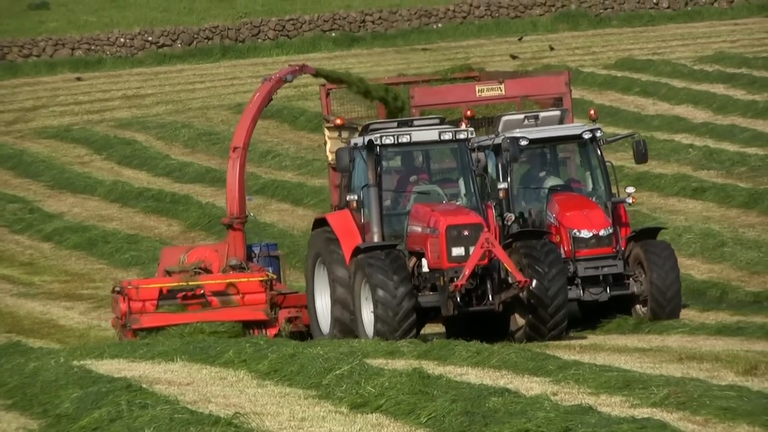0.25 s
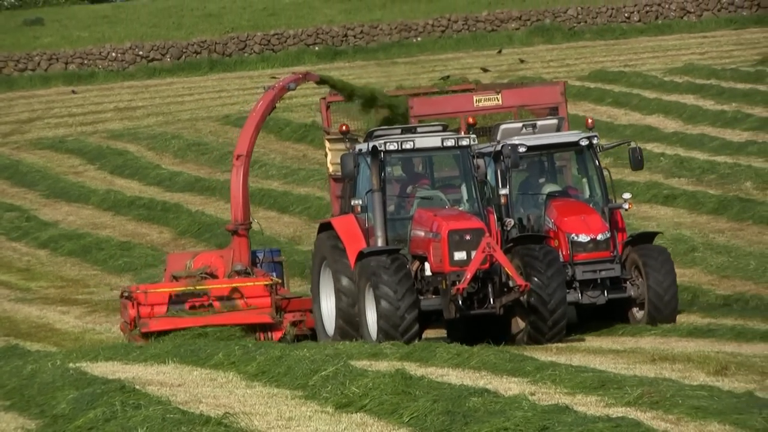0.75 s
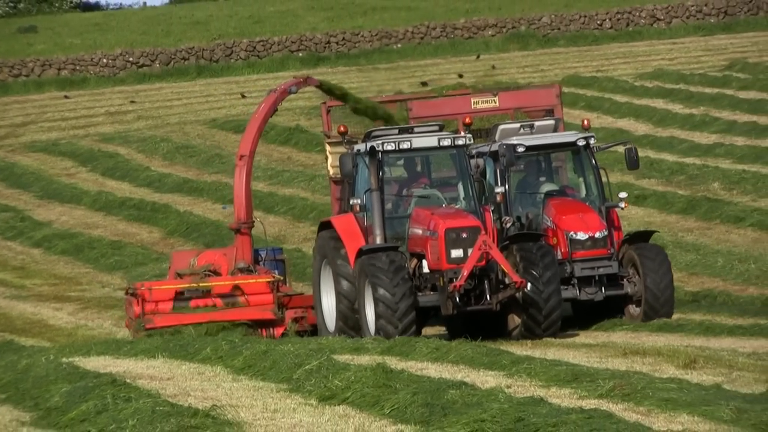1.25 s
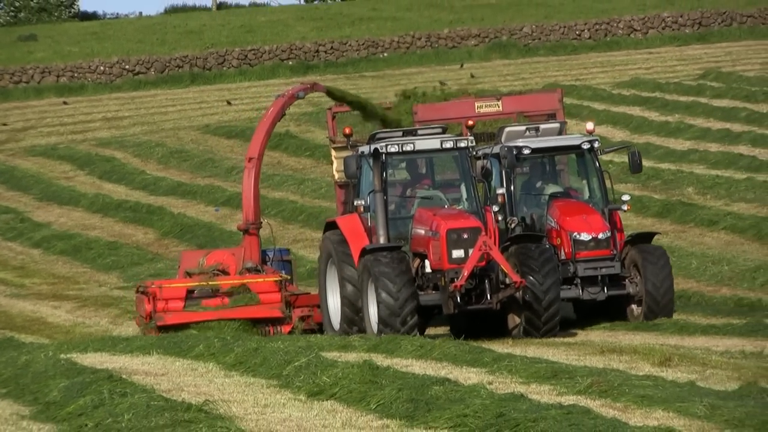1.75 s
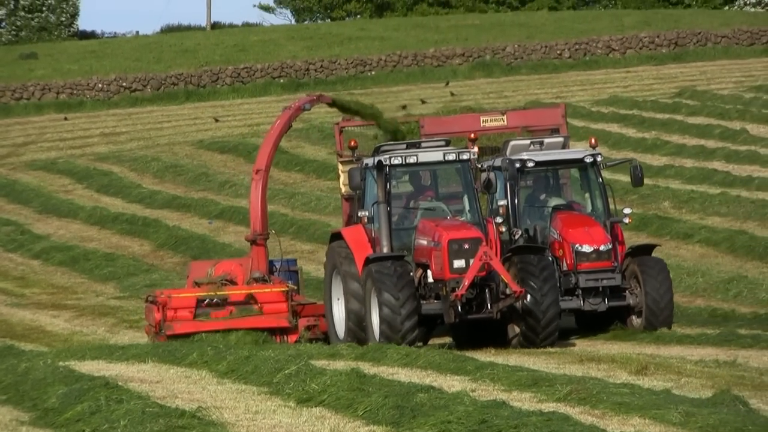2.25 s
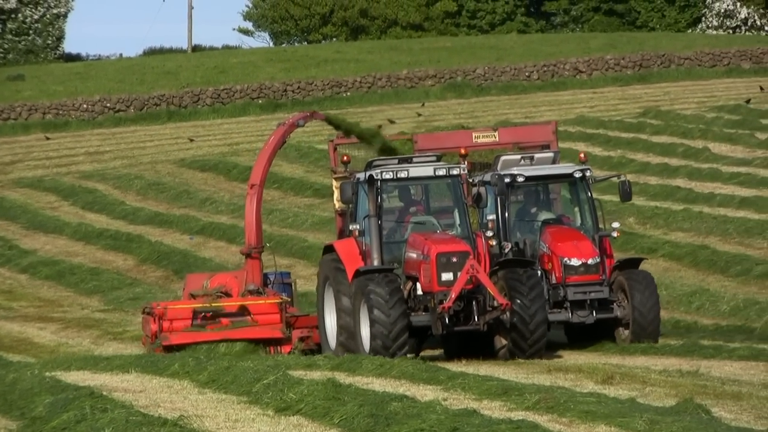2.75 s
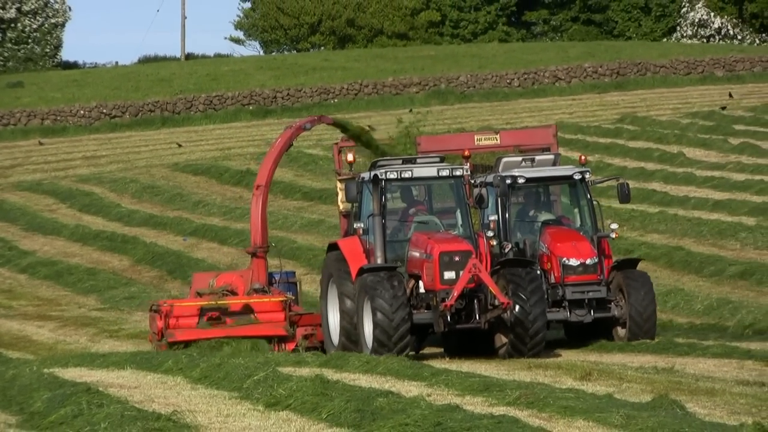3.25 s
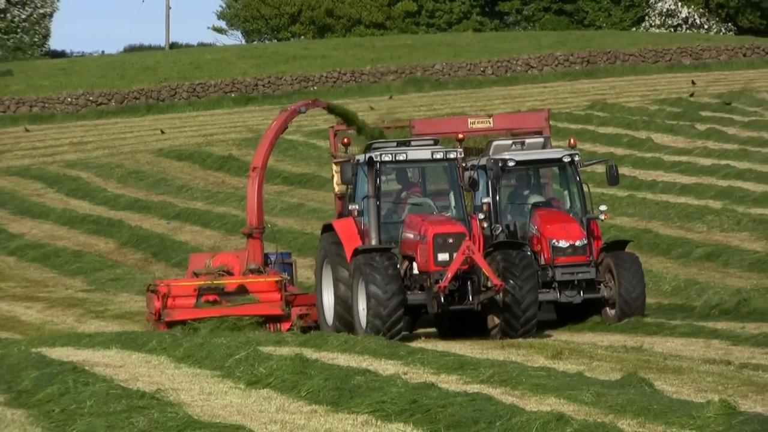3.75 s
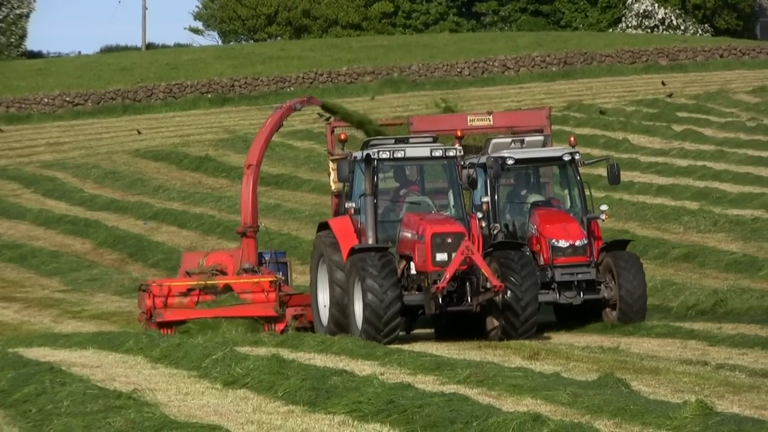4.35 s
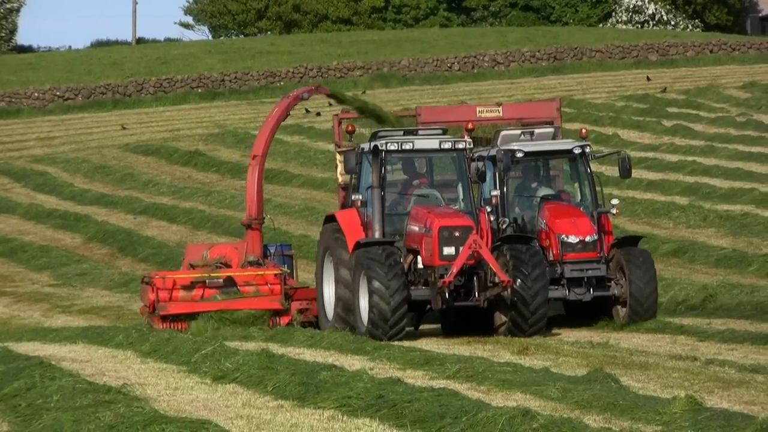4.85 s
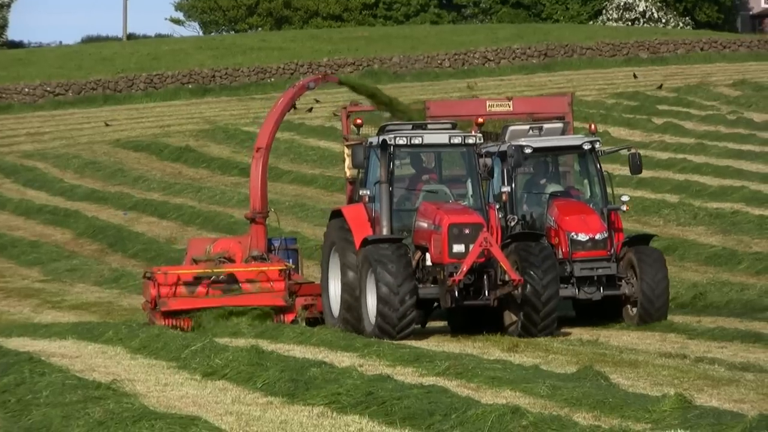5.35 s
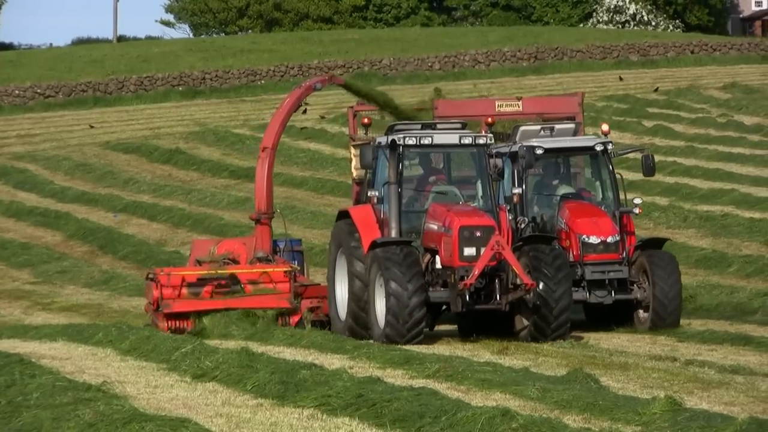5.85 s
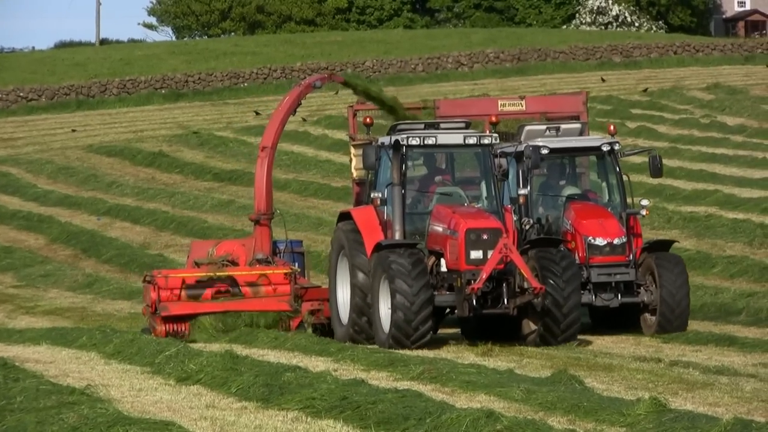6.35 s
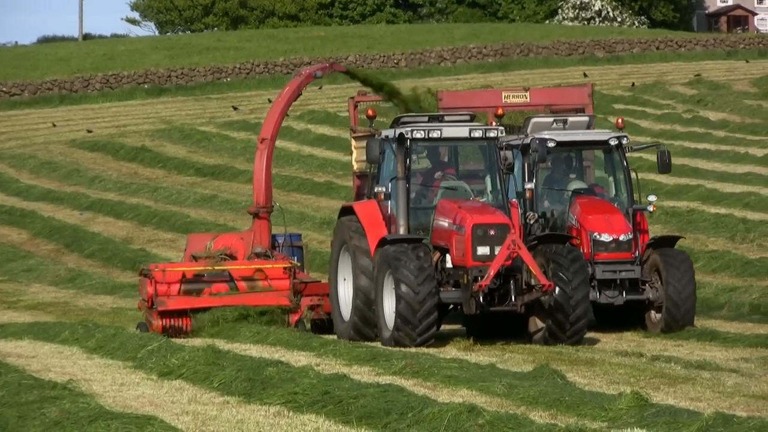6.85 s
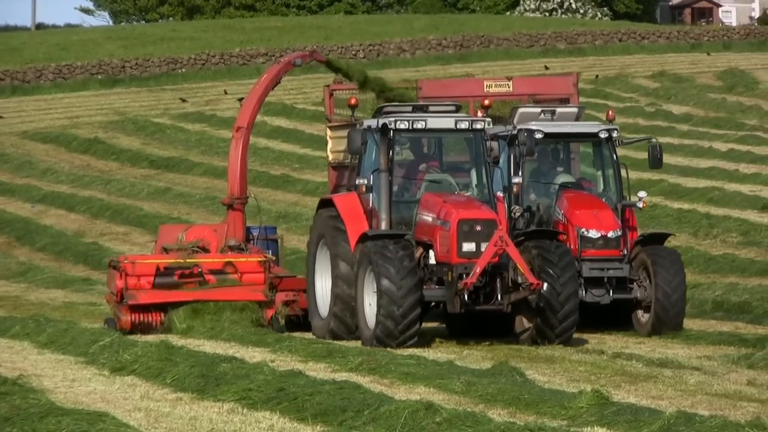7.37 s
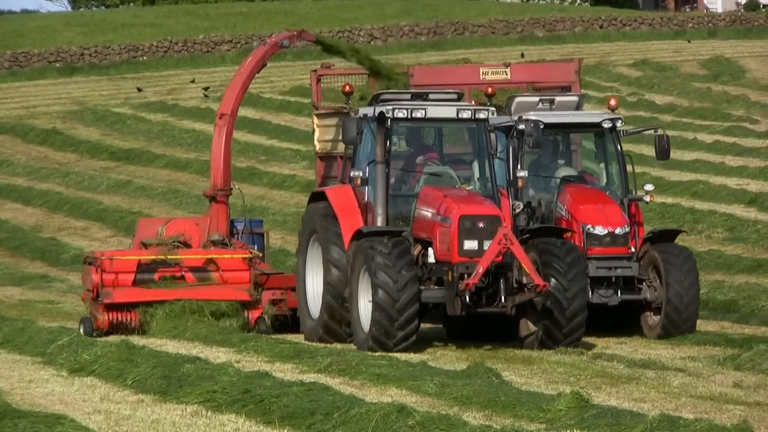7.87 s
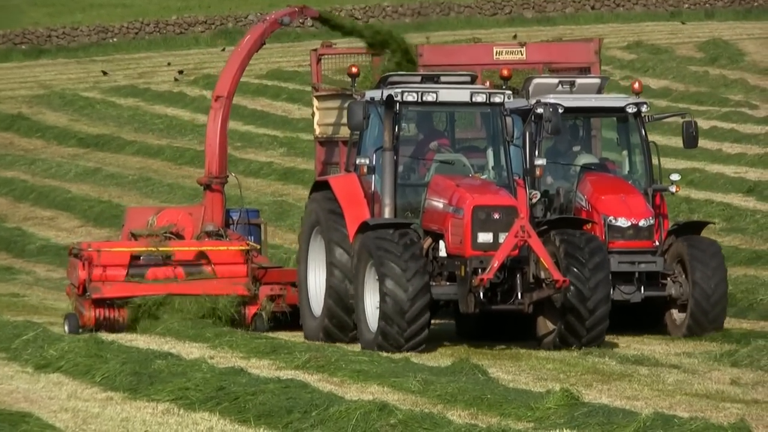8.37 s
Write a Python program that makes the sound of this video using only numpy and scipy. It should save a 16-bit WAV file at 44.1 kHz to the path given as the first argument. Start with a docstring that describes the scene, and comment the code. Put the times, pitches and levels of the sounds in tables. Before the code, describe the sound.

Steady diesel tractor drone and clatter, with a forage harvester's throbbing blades and hissing grass, gradually coming closer.

```python
"""A six-cylinder diesel tractor hums and clatters over a field, driving a forage harvester (a grass chopper).
Each firing pushes a pulse out of the exhaust and knocks the casing; the hum beats against the blades' hum.
Cut grass hisses up the spout, thick wads scrape and squeal, steel clanks and turbos whistle faintly.
A second tractor crawls alongside with the trailer, its gears whining. All slowly come closer, and the
distant microphone's gain control lifts everything else whenever engine hum and blade hum cancel."""
import sys
import numpy as np
from scipy import signal
from scipy.fft import rfft, irfft, next_fast_len
from scipy.io import wavfile
from scipy.ndimage import uniform_filter1d, map_coordinates

SR = 44100
rng = np.random.default_rng(int(sys.argv[2]) if len(sys.argv) > 2 else 0)


def generate_wav(sig):
    """Save sig (samples, or channels by samples) to the path in sys.argv[1] as 16-bit PCM at SR."""
    pcm = np.round(np.clip(np.atleast_2d(sig).T, -1, 1) * 32767).astype(np.int16)
    wavfile.write(sys.argv[1], SR, pcm)


N = 379701
TIME = np.arange(N) / SR

# how fast the main engine fires (time [s], firing rate [Hz])
FIRING_RATE = [(0.2, 103.4), (0.5, 105), (1.0, 104.7), (1.3, 103.2), (1.8, 103.0), (2.15, 104.2),
               (2.5, 102.6), (3.2, 104.2), (3.8, 103.8), (4.8, 104.2), (5.4, 103.75), (6.5, 106.3),
               (7.1, 105.1), (7.6, 105.2), (8.0, 106), (8.6, 104.7)]
# exhaust overtones; one engine cycle is six firings (multiple of the cycle rate [-], relative level [dB])
EXHAUST_TONES = [(5, -30), (7, -29), (11, -33), (13, -34), (14, -37), (16, -39)]
# tones of the engine block (multiple of the cycle rate [-], relative level [dB])
BLOCK_TONES = [(19, 0), (23, -1), (32, -11), (38, -11), (42, -9)]
# how hard each cylinder knocks, in firing order (relative level [dB])
CYLINDER_KNOCK_DB = [-3, -7, 1.6, 1.7, -1.5, -3.5]
# ring of the engine casing from far off (frequency [Hz], relative level [dB])
FAR_CASING_SPECTRUM = [(350, -44), (600, -19.5), (708, -9), (828, -19), (954, -7), (1130, -9), (1310, -5),
                       (1520, -5.5), (1830, -1.5), (2160, -1), (3200, -3), (3660, -12), (3930, -18.5),
                       (5110, -57), (8650, -120)]
# ring of the casing from closer by (frequency [Hz], relative level [dB])
NEAR_CASING_SPECTRUM = [(350, -34), (600, -14.5), (760, -4), (841, -27), (977, -2), (1170, -9),
                        (1250, -5.5), (1800, 0), (1950, -0.5), (2010, -1), (2390, -3.5), (3490, -14),
                        (3930, -32), (5110, -24.5), (8650, -120)]
# rumble of the running gear (frequency [Hz], relative level [dB])
RUMBLE_SPECTRUM = [(20, -11), (30, -0.5), (45, 5), (70, 2), (115, 13.5), (170, 7), (280, 2), (390, -2.5),
                   (500, -6.5), (720, -5.5), (850, -6.5), (1500, -8.5), (4000, -48.5)]
# hiss of grass in the spout (frequency [Hz], relative level [dB])
GRASS_SPECTRUM = [(1500, -26.5), (3700, 4), (4700, -0.5), (6000, -8), (7200, -11.5), (8000, -13),
                  (9800, -15.5), (11500, -23), (13000, -31), (15000, -45.5)]
# the row of grass thickens and thins (time [s], hiss against the clatter [dB], blade throb [dB])
GRASS_FEED = [(0, -25, -26), (2, -20.5, -23.5), (3.3, -19, -25.5), (4.2, -17.5, -22), (5, -16.5, -26.5),
              (6.4, -14.5, -25), (7.1, -16, -36.5), (8.6, -15.5, -29)]
# moments when the blade hum works against the engine hum (time [s])
CANCEL_TIMES = [-.25, .66, 1.5, 2.36, 3.14, 3.96, 4.88, 5.66, 6.48, 7.42, 8.28, 9.15]
# throb of the blades (multiple of the blade rate [-], relative level [dB])
THROB_TONES = [(3, -3), (4, -8.5)]
# buzz of the chopper's housing (multiple of the blade rate [-], relative level [dB])
BUZZ_TONES = [(5, -0.5), (6, -17.5), (7, -17), (8, -34.5)]
# strength of that buzz before its swells are added (time [s], level [dB])
BUZZ_LEVEL = [(0, -27.5), (.4, -34), (.9, -37), (1.15, -26.5), (1.7, -33), (2.75, -31), (3.2, -29.5),
              (4.1, -28), (4.7, -34.5), (5.2, -24.5), (6, -36), (7.7, -33), (8.6, -32.5)]
# how fast the second tractor fires (time [s], firing rate [Hz])
SECOND_FIRING_RATE = [(0, 106.4), (.4, 106.2), (1.1, 104.9), (2, 105.8), (3.7, 106.3), (6, 105.2),
                      (6.8, 103.6), (8.6, 102.9)]
# its hum and gear whine (multiple of its firing rate [-], relative level [dB])
SECOND_TONES = [(1, 3), (18, -4), (19, -7), (20, 0), (21, -2), (22, -7)]
# whistle of the turbos (frequency [Hz], relative level [dB])
TURBO_SPECTRUM = [(7500, -24.5), (7730, -5), (7850, -7.5), (7970, 0), (8250, -5.5), (8800, -35),
                  (13000, -40), (13440, -16), (13700, -45)]
# single hard blows on steel (time [s], level [dB], ring frequency [Hz])
STEEL_BLOWS = [(.31, -22.5, 2600), (1.634, -22.5, 2200), (2.213, -19, 2400), (2.855, -21, 2000),
               (5.864, -20, 2000), (6.658, -20, 1900), (7.415, -17.5, 2100), (8.35, -22, 3000)]
# wads of grass in the spout (time [s], level [dB], rise [s], decay [s], share of squeal [0-1])
GRASS_WADS = [(.51, -38.5, 0.024, 0.091, 0.8), (.8, -44, .01, .02, 0.8), (.89, -40, .02, 0.021, 0.6),
              (1.41, -41.5, 0.057, 0.065, 0.68), (1.63, -48, .06, .07, 0.6),
              (5.15, -38, 0.0049, 0.019, 0.22), (5.691, -48, .03, 0.046, .8), (6.527, -35, .004, .018, .1),
              (6.65, -46, .03, .04, 0.21), (8.355, -36, .04, 0.12, 0.1), (8.367, -41, .003, .008, 0)]
# bright rush of a wad (frequency [Hz], relative level [dB])
SPRAY_SPECTRUM = [(2000, -11), (3500, 7.5), (6000, -3), (10000, -4.5), (13000, -17), (15000, -23)]
# grass squealing on steel (frequency [Hz], relative level [dB])
SQUEAL_SPECTRUM = [(3500, -25), (4600, -3), (5300, 5), (6500, -10), (8000, -21), (12000, -25)]

# each pair holds the value at the (start, end) of the approach
EXHAUST_DB, BLOCK_DB, CLATTER_DB, BLADE_HUM_DB = (-14.5, -12), (-46, -37.5), (-22, -25), (-26, -15.5)
OVERTONE_DB, RUMBLE_DB = (-1.5, 3), (-5.5, 2.5)  # on top of the exhaust level and the clatter level
KNOCK_CONTRAST = (.97, .83)  # below 1 the knocks blur into a rush


def undb(db):
    """Turn decibels into a gain."""
    return 10 ** (np.asarray(db) / 20)


def unit(x):
    """Scale a signal to an average strength (rms) of 1."""
    return x / np.sqrt(np.mean(x ** 2))


def sine(turns):
    """A pure tone of rms 1, one wave per turn."""
    return np.sqrt(2) * np.sin(2 * np.pi * turns)


def curves(table):
    """Join the points of each table column with straight lines in time."""
    times, *columns = np.transpose(table)
    return [np.interp(TIME, times, column) for column in columns]


def nearing(levels_db):
    """A gain that moves evenly in dB from start to end as the machines approach."""
    return undb(np.interp(TIME, [0, TIME[-1]], levels_db))


def colour(x, spectrum):
    """Pass a sound through a body with the given spectrum; the result has rms 1."""
    hz, db = np.transpose(spectrum)
    size = next_fast_len(N)
    log_hz = np.log(np.maximum(np.fft.rfftfreq(size, 1 / SR), 1))
    gain = undb(np.interp(log_hz, np.log(hz), db, left=-200, right=-200))
    return unit(irfft(rfft(x, size) * gain, size)[:N])


def wander(rate):
    """A random drift of rms 1 that heads for a new value `rate` times a second."""
    return unit(np.interp(TIME * rate, np.arange(N // 10), rng.standard_normal(N // 10)))


def harmonics(turns, table, waver_db, slip, rate, aligned=False):
    """Tones of a spinning part, wavering in level and phase (`slip`, in turns); aligned ones start in step."""
    out = 0
    for multiple, db in table:
        gain = undb(db + waver_db * wander(rate))
        start = 0 if aligned else rng.random()
        out = out + gain * sine(round(multiple) * turns + start + slip * wander(rate))
    return out


def exhaust(pulses):
    """Exhaust pulses merge into a smooth hum with overtones, which wavers in the open air."""
    waver = undb(0.72 * wander(9))
    hum = sine(pulses) + undb(-26) * sine(2 * pulses)
    half_rate = undb(-24) * sine(pulses / 2 + 1 / 4)  # from the two halves of the exhaust manifold
    cycles = pulses / len(CYLINDER_KNOCK_DB)
    overtones = harmonics(cycles, EXHAUST_TONES, waver_db=1.0, slip=0.02, rate=9)
    return nearing(EXHAUST_DB) * waver * (hum + half_rate + nearing(OVERTONE_DB) * overtones)


def knocks(firings, scatter_db, decay_s, rise_s, jitter_s, valve_floor):
    """How hard the block shakes: each firing gives a jolt that dies away, over steady valve noise."""
    count = firings.astype(int)
    size_chance, time_chance = rng.standard_normal((count[-1] + 1, 2)).T
    sizes = undb(np.resize(CYLINDER_KNOCK_DB, len(size_chance)) + scatter_db * size_chance)
    starts = np.searchsorted(count, np.arange(len(sizes))) + (jitter_s * SR * time_chance).astype(int)
    jolts = np.bincount(np.clip(starts, 0, N - 1), sizes, N)
    age = TIME[:SR // 20]
    jolt_shape = np.exp(-age / decay_s) * (1 - np.exp(-age / rise_s))
    return np.hypot(signal.fftconvolve(jolts, jolt_shape)[:N], valve_floor)


def rattle(firings, repeat):
    """Metal noise; the share `repeat` comes back alike in every engine cycle."""
    place_in_cycle = (firings / len(CYLINDER_KNOCK_DB) + 0.00066 * wander(25)) % 1
    pattern = rng.standard_normal(SR // 40)
    repeating = unit(map_coordinates(pattern, [place_in_cycle * len(pattern)], order=3, mode="grid-wrap"))
    return np.sqrt(repeat) * repeating + np.sqrt(1 - repeat) * rng.standard_normal(N)


def running_gear(firings):
    """The moving parts rattle with a low rumble."""
    return nearing(RUMBLE_DB) * colour(rattle(firings, repeat=0.054), RUMBLE_SPECTRUM)


def engine_block(firings):
    """The block sings a few faint tones in step with the engine cycle."""
    cycles = firings / len(CYLINDER_KNOCK_DB)
    return nearing(BLOCK_DB) * harmonics(cycles, BLOCK_TONES, waver_db=1.5, slip=.03, rate=8)


def clatter(firings, knock, split_hz=1500, near_share=0.86, settled_s=5.1):
    """The knocks ring the engine's casing; the ring changes colour as the tractor comes closer."""
    knock = knock ** np.interp(TIME, [0, TIME[-1]], KNOCK_CONTRAST)
    sharp = unit(knock * rattle(firings, repeat=0.15))
    blurred = unit(knock ** 0.86 * rattle(firings, repeat=0.087))
    # heavy, low panels ring on between knocks; light, high ones follow each blow
    heavy = signal.sosfilt(signal.butter(3, split_hz, "low", fs=SR, output="sos"), blurred)
    light = signal.sosfilt(signal.butter(3, split_hz, "high", fs=SR, output="sos"), sharp)
    panels = heavy + light
    near = near_share * np.minimum(TIME / settled_s, 1)
    return (1 - near) * colour(panels, FAR_CASING_SPECTRUM) + near * colour(panels, NEAR_CASING_SPECTRUM)


def grass_hiss(knock):
    """Chopped grass hisses along the spout, shaken by the engine's knocks."""
    shake = 1 + 0.62 * unit(knock)
    return colour(shake * undb(1.1 * wander(45)) * rng.standard_normal(N), GRASS_SPECTRUM)


def chopper(pulses, throb_db):
    """Blades pass at just under half the firing rate, so their octave beats against the engine hum."""
    beats = np.interp(TIME, CANCEL_TIMES, np.arange(len(CANCEL_TIMES)))
    blades = (pulses - beats - .5) / 2  # the octave falls one wave behind per beat
    hum = undb(-40.5) * sine(blades) + nearing(BLADE_HUM_DB) * sine(2 * blades)
    throb = harmonics(blades, THROB_TONES, waver_db=2.0, slip=0.062, rate=6, aligned=True)
    buzz = harmonics(blades, BUZZ_TONES, waver_db=2.04, slip=0.027, rate=7)
    buzz_db, = curves(BUZZ_LEVEL)
    swell_db = 2.5 * np.cos(2 * np.pi * (beats - .06))  # peaks just after the hums cancel
    return hum + undb(throb_db) * throb + undb(buzz_db + swell_db) * buzz


def second_tractor():
    """The tractor with the trailer adds its own faint hum and a thin gear whine."""
    firing_hz, = curves(SECOND_FIRING_RATE)
    return undb(-37) * harmonics(np.cumsum(firing_hz) / SR, SECOND_TONES, waver_db=2.0, slip=0.025, rate=11)


def turbo(knock, top_db=-58.5, top_s=4.5, fall_db_per_s=2.5):
    """The turbochargers' faint whistle swells and fades once, fluttering with the engine's knocks."""
    swell_db = top_db - fall_db_per_s * np.abs(TIME - top_s)
    flicker_db = 3.2 * wander(30) + 1.4 * wander(5.1)
    return undb(swell_db + flicker_db) * colour(knock * rng.standard_normal(N), TURBO_SPECTRUM)


def breeze():
    """A little air stirs at the microphone and makes a soft, deep rumble."""
    gusts = undb(-44 + 2.5 * wander(5))
    return gusts * colour(rng.standard_normal(N), [(15, 0), (60, -7), (300, -33)])


def clanks(decay_s=.011, width_hz=600):
    """Now and then a hard blow rings the steel for a moment."""
    make_up = np.sqrt(SR / 2 / width_hz)  # gives back the level that the narrow filter takes away
    out = 0
    for start, db, hz in STEEL_BLOWS:
        ring = signal.butter(2, [hz - width_hz / 2, hz + width_hz / 2], "bandpass", fs=SR, output="sos")
        fade = (TIME >= start) * np.exp(-np.minimum(np.abs(TIME - start) / decay_s, 20))
        out = out + undb(db) * make_up * signal.sosfilt(ring, fade * rng.standard_normal(N))
    return out


def wads():
    """Thick wads of grass give short, bright rushes; dry ones squeal along the steel."""
    scrape = undb(3.3 * wander(300)) * rng.standard_normal(N)
    spray, squeal = colour(scrape, SPRAY_SPECTRUM), colour(scrape, SQUEAL_SPECTRUM)
    out = 0
    for peak_s, db, rise_s, decay_s, share in GRASS_WADS:
        from_peak = np.maximum((peak_s - TIME) / rise_s, (TIME - peak_s) / decay_s)
        swell = np.exp(-np.minimum(from_peak, 20))
        out = out + undb(db) * swell * ((1 - share) * spray + share * squeal)
    return out


def scene():
    """The far-off machines all sound from one direction; only the breeze differs between left and right."""
    firing_hz, = curves(FIRING_RATE)
    grass_db, throb_db = curves(GRASS_FEED)
    firings = np.cumsum(firing_hz) / SR  # counts up by one per firing
    pulses = firings + .5  # exhaust pulses fall halfway between knocks
    knock = knocks(firings, scatter_db=1.0, decay_s=0.002, rise_s=0.0022, jitter_s=0.00017, valve_floor=0.1)
    hum = exhaust(pulses)
    rumble = running_gear(firings)
    block = engine_block(firings)
    noise = nearing(CLATTER_DB) * (clatter(firings, knock) + rumble + undb(grass_db) * grass_hiss(knock))
    machines = hum + block + noise + chopper(pulses, throb_db) + second_tractor()
    field = machines + wads() + clanks() + turbo(knock)
    air = breeze()
    return np.array([field + air, field - air])


def gain_control(x, target_db, slope, attack_s, release_s):
    """Follow the level, quickly up and more slowly down; turn loud moments down and quiet ones up."""
    step = 64  # samples
    power = uniform_filter1d(x.mean(axis=0) ** 2, SR // 100)
    levels = np.sqrt(np.maximum(power, 0))[::step]
    held, followed = undb(target_db), []
    for level in levels:
        lag_s = attack_s if level > held else release_s
        held += (level - held) * (1 - np.exp(-step / SR / lag_s))
        followed.append(held)
    loudness = np.interp(np.arange(N), np.arange(len(levels)) * step, followed)
    return x * (undb(target_db) / loudness) ** slope


def record(dry):
    """The microphone evens out the level, loses the deepest bass on the left and cuts the highest treble."""
    left, right = gain_control(dry, target_db=-13.5, slope=0.7, attack_s=0.034, release_s=0.095)
    lost_bass = signal.sosfilt(signal.butter(1, 36, fs=SR, output="sos"), left)
    # above the bass both sides stay alike
    left = left - signal.sosfiltfilt(signal.butter(2, 380, fs=SR, output="sos"), lost_bass)
    treble_cut = signal.ellip(8, .2, 70, 15100, fs=SR, output="sos")
    return signal.sosfilt(treble_cut, np.array([left, right]))


dry = scene()
out = record(dry)
generate_wav(out)
```